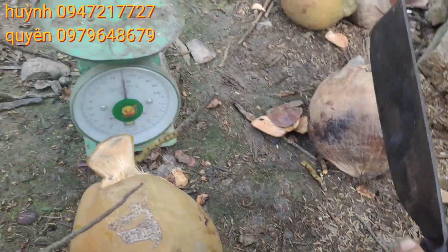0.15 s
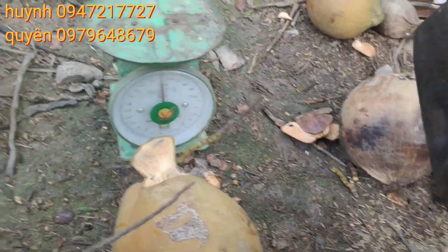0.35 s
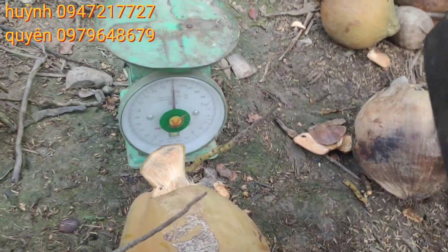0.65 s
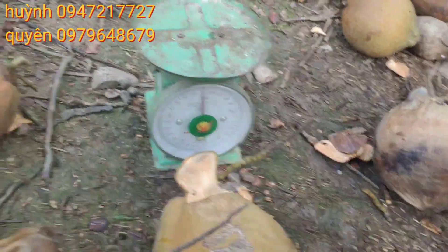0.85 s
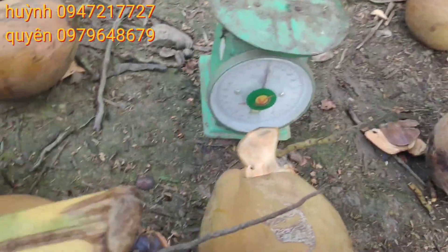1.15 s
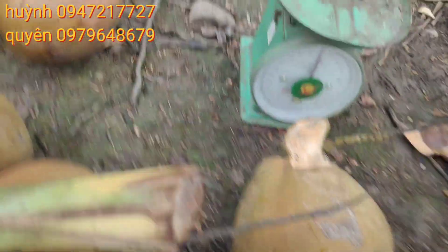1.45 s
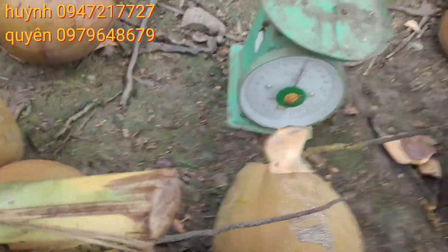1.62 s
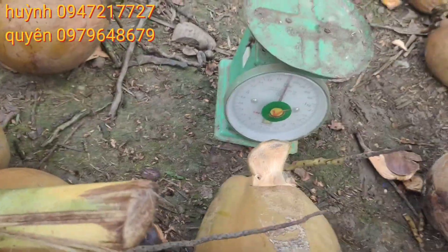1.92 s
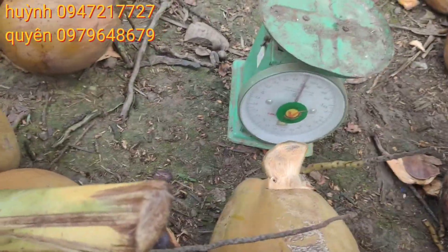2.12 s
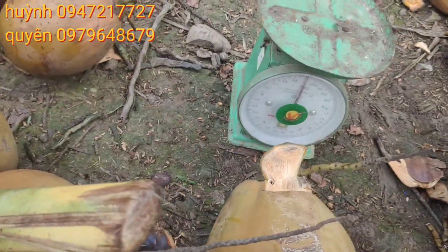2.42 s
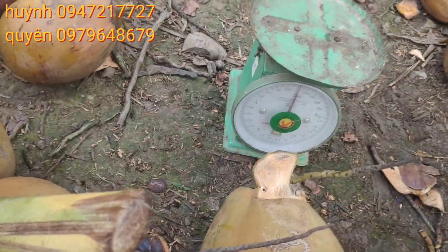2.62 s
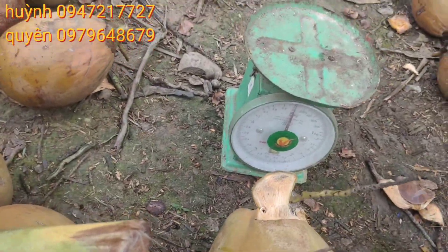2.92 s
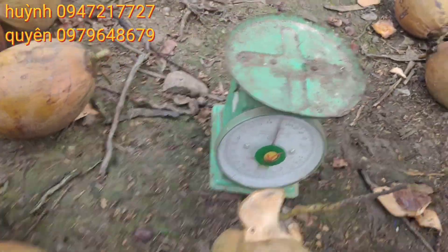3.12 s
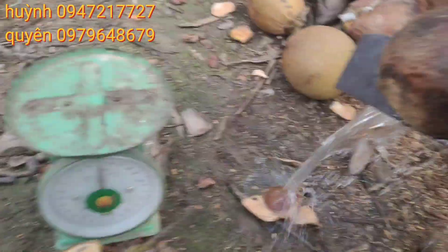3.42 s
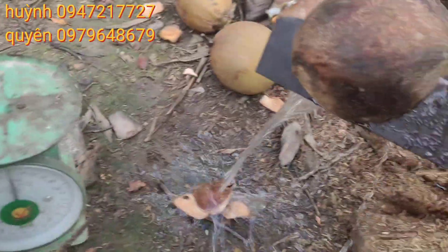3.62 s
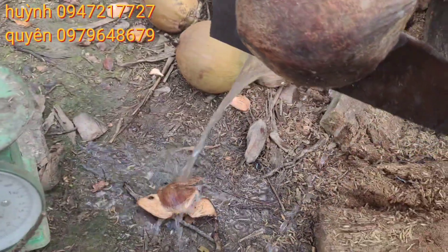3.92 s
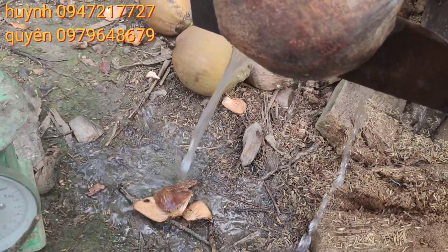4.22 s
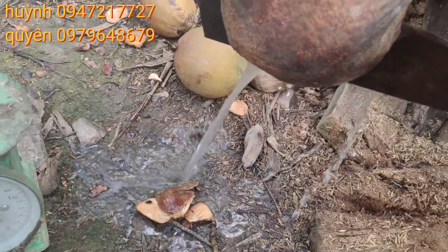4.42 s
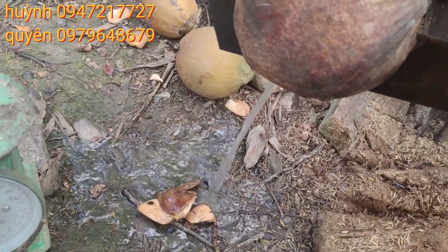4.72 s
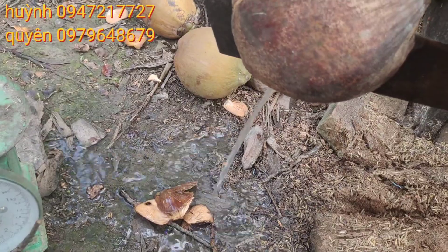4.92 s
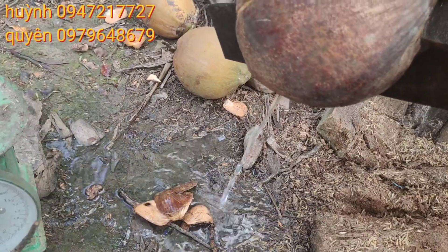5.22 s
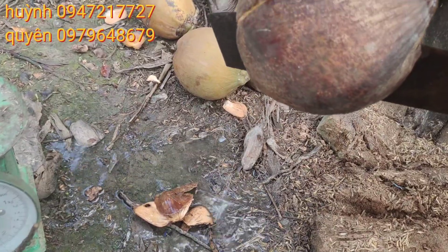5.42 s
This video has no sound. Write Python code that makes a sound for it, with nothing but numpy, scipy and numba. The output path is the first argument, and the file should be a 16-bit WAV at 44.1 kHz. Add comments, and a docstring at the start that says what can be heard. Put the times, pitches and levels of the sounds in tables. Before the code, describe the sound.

Faint hiss and small handling knocks, one loud woody chop into a coconut, then a short gush of liquid splashing and dripping onto soil.

```python
"""Coconut cracked in a yard

Background hiss opens briefly and small knocks sound, then a heavy blade cracks a coconut and the yard rings
after it. Water runs out and patters in drops and splats, over a far engine. Hiss and stream are many tiny
gliding tones over noise; drops are pops with spray and slap; knocks and blow are noise through resonances and
decaying modes; the engine is multiples of a firing rate over rumble. A hand-held phone hears it all."""
import sys
import numpy as np
from scipy import signal
from scipy.fft import rfft, irfft, next_fast_len
from scipy.io import wavfile
from scipy.ndimage import uniform_filter1d
from numba import njit

SR = 44100
rng = np.random.default_rng(int(sys.argv[2]) if len(sys.argv) > 2 else 0)


def log_audio(samples):
    """Write samples as a 16-bit WAV file to the path given in sys.argv[1]."""
    # one column per channel
    frames = np.atleast_2d(samples).T
    # limit to full scale, then quantise
    limited = np.clip(frames, -1, 1)
    pcm = np.round(limited * 32767).astype(np.int16)
    wavfile.write(sys.argv[1], SR, pcm)


N = 244962

# Far engine. Each row: time in seconds, firing rate in Hz, level in dB, upper over lower multiples in dB.
ENGINE = [(0.1, 37.6, -80, -10), (1.1, 38.1, -77.5, -4), (1.3, 37.97, -74, 8), (1.75, 38.27, -64.5, -8.5),
          (2.05, 37.75, -63, -18), (2.3, 37.8, -61, -3.5), (2.7, 37.9, -57.5, -6),
          (3.35, 37.73, -63.5, 11.5), (4.05, 38.3, -56.5, -2.5), (4.28, 38.06, -67.5, 6),
          (4.55, 38.28, -58, 1.5), (4.9, 38.42, -61.5, -4), (5.15, 38.66, -56, -10.5),
          (5.55, 38.1, -59.5, 2)]
LOWER_DB, UPPER_DB = [0, -4], [-6.5, -1.5, -3.5, -14.5]  # multiples 2, 3 and multiples 4 to 7 of the firing rate
# Engine rumble spectrum. Each row: frequency in Hz, level in dB per Hz.
RUMBLE_COLOUR = [(20, -28.5), (38, -19.5), (58, -3.5), (76, -4.5), (193, -2), (323, -15.5), (400, -20.5),
                 (520, -50), (880, -120)]
RUMBLE_DB = -6.5  # rumble over the multiples together
TRAFFIC_DB = -72  # floor under the rumble, before it throbs

# Edges of the low, middle and treble bands of hiss and stream, in Hz.
BAND_EDGES_HZ = [300, 1000, 3500, 16500]
# Brief openings of the background hiss, as through a noise gate. Each row: start in seconds, treble level in dB,
# hold in seconds, fall in dB per second, middle over treble in dB, low over treble in dB.
OPENINGS = [(0.0, -60, 0.14, 113, -2.5, -2), (0.419, -62.5, 0.11, 97, 4.5, -9.5),
            (0.469, -61.5, 0.04, 202, 7, -4), (0.594, -66, 0.051, 700, 8.5, -3.5),
            (0.885, -62, 0.061, 132, -22, -31), (1.17, -65, 0.062, 134, -8, -12),
            (1.472, -68, 0.17, 126, -1.5, 5.5), (2.008, -72, 0.17, 130, -6.5, -10),
            (2.352, -68, 0.36, 125, -4, -5.5)]
# Background hiss spectrum. Each row: frequency in Hz, level in dB per Hz.
HISS_COLOUR = [(150, -55.5), (250, -7), (361, -7.5), (540, -9.5), (1250, -13), (1940, -15.5), (3060, -13),
               (4650, -18.5), (7200, -16.5), (9870, -28.5), (15000, -22), (16400, -38)]
# Faint hiss between openings. Entries: level in dB of the low, middle and treble band.
FAINT_DB = [-81.5, -77, -75.5]
HISS_SPAN_S, HISS_FLICKER_DB, OPENING_RISE_S = (0, 2.92), .6, 0.0079

# Small knocks of handling. Each row: time in seconds, level in dB, body over click in dB, hollowness in dB,
# brightness in dB, husk ring in dB.
TAPS = [(0.7239, -38, -5.5, 15, -14, -11), (0.9, -43, -28, 9, -3.5, -2), (1.284, -54, -9, 22, -20, -10),
        (1.748, -44, -4, 7, -9, 14), (1.8184, -52.5, -3.5, -3, 3, 6), (2.156, -47.5, -32, -7, -11, -3),
        (2.9005, -48.5, -1, -3, -12, 4), (3.021, -50, 8.5, -1.5, -9, 9), (3.0283, -48, 6, -3, -11, -2),
        (3.0744, -53.5, 10.5, -9, -8, 4), (3.1, -40, -2.5, -23, -8, 14), (3.3592, -32, -4.5, -2, -7, 0)]
# Knock resonances, three of the body then three of the click. Each row: frequency in Hz, level in dB,
# time to fall 60 dB in seconds.
TAP_MODES = [(385, -0.5, 0.024), (652, 1.5, 0.017), (980, -4, 0.011), (1550, -2, 0.026),
             (2977, 14.5, 0.028), (6370, 23, 0.0091)]

# The stream. Each row: time in seconds, treble level in dB, middle over treble in dB.
POUR = [(2.85, -57.5, -9.5), (3.19, -65.5, 0.5), (3.23, -51.5, -13.5), (3.4, -52.5, -14),
        (3.52, -43.5, -1.5), (3.8, -47, -7.5), (4.15, -45.5, -2.5), (4.4, -45, -9), (4.7, -47.5, -3.5),
        (4.85, -50.5, -5.5), (5.0, -49.5, -9), (5.12, -55, -8), (5.27, -56, -14), (5.4, -59.5, -3),
        (5.55, -58.5, -7.5)]
# Stream spectrum. Each row: frequency in Hz, level in dB per Hz.
WATER_COLOUR = [(150, -60), (250, -12), (303, -17.5), (632, -15.5), (1070, -17.5), (1250, -11),
                (2150, -9.5), (2850, -7), (4650, -2.5), (7080, 4), (8000, -2.5), (11400, -13.5), (15000, 2),
                (16400, -14)]
# Gurgles that swell the low band. Each row: start in seconds, level in dB, hold in seconds.
GURGLES = [(2.978, -65, 0.28), (3.324, -61, 0.078), (3.84, -55.5, 0.37), (4.49, -65, 0.3),
           (4.848, -61.5, 0.16)]
GURGLE_RISE_S, GURGLE_FALL_DB_S = 0.071, 102
POUR_LOW_DB = -18.5  # low band over treble in a smooth stream
WATER_SPAN_S, WATER_FLICKER_DB = (2.86, 6), 1.2
WATER_LAG = 4  # samples by which the left port hears the water later

# Single drops on the ground, and a few short ticks and knocks. Each row: time in seconds, level in dB,
# middle over treble in dB.
DROPS = [(1.763, -40, -22), (2.178, -38.5, -12), (2.483, -38, -5.5), (2.6, -43.5, -3.5), (2.848, -51.5, 7),
         (2.9465, -40, -31), (2.9767, -32.5, -35), (3.196, -48, -25), (3.216, -31, -20), (3.262, -27, -20),
         (3.325, -43, -10), (3.361, -23.5, -8), (3.384, -34, 5), (3.4194, -28, -6.5), (3.42, -20, -31),
         (3.438, -19.5, -21), (3.499, -38, -18), (3.6101, -29, 0.5), (3.6588, -25, -28), (3.685, -28, -14),
         (3.702, -30, 1), (3.7102, -28, 8.5), (3.728, -29, -20), (3.779, -38, -15), (3.8, -31, -1),
         (3.818, -39, -16), (3.874, -38, -10), (3.9198, -15.5, -21), (3.9318, -18, -25), (3.987, -25, -3.5),
         (4.0821, -29, -15), (4.094, -24.5, -22), (4.113, -26, -18), (4.124, -24, -25), (4.22, -28, 2),
         (4.2383, -24, -9), (4.3074, -30.5, 3.5), (4.3184, -27, -20), (4.362, -30, -4), (4.384, -15.5, -11),
         (4.403, -33, -20), (4.426, -31, -25), (4.486, -33, 3.5), (4.5405, -35, -15), (4.552, -27, -22),
         (4.6342, -26, -22), (4.6477, -36, 7), (4.682, -32, -3), (4.872, -36, -12), (4.942, -34, -13),
         (5.2878, -27.5, -35), (5.311, -41, -6), (5.3274, -23, -16.5), (5.3734, -19, -10),
         (5.3948, -20, -1.5), (5.474, -29.5, -14)]
# Drops sound deeper once a puddle stands. Each row: time in seconds, centre of the slap's band in Hz.
DROP_MIDDLE = [(3.5, 2560), (4.7, 2680), (5.3, 1640)]
PING_HZ, PING_RISE_S, PING_T60_S = (6000, 7300), .0004, .006  # a drop pops at its own pitch in this range
SPRAY_DB, SPRAY_T60_S = -12, 0.017  # hiss thrown up around the pop; a slap throws up more
# lesser drops: how many a second, their least level over the stream's treble, and the spread above it
SMALL_RATE, SMALL_DB, SMALL_SPREAD_DB = 110, 4, 4

DROP_SNAP, BLOW_SNAP = 8.3, 13  # first instant of contact, against spray or grit of rms 1
BLOW_S, BLOW_DB = 1.5394, -10
BITE_S, SPLIT_T60_S = .0015, .014  # time constant of the bite, 60 dB fall of the split
# Resonances of shell and blade. Each row: frequency in Hz, half-width in Hz, level in dB before width scaling.
NUT = [(764, 130, -5.5), (1495, 64, 4.5), (2400, 65, -3), (2800, 45, 0), (3120, 50, -11.5), (3750, 110, -1),
       (4590, 69, -6), (5810, 100, -2.5), (6940, 69, -2)]
# Modes of the block. Each row: frequency in Hz, level in dB before the band-pass, time to fall 60 dB in seconds.
THUMP = [(137, -12, 0.012), (262, -18.5, 0.031), (393, -18, 0.033), (764, -23.5, 0.099), (102.5, -47.5, 3),
         (253, -42, 0.37)]
# Spectrum of the yard's answer. Each row: frequency in Hz, level in dB per Hz.
YARD = [(88, -39), (150, -17), (292, -3.5), (497, -16), (845, -7.5), (1070, -20), (1410, -1.5),
        (1850, -8.5), (2690, -8), (6520, -11), (10600, -31.5), (14900, -30)]
YARD_DB, YARD_T60_S = -21, 0.37
YARD_NUT = 0.42  # share of the shell's pitches in the yard's answer

# The phone's two ports. Each row: frequency in Hz, left minus right in dB.
PORTS = [(60, -4.5), (110, 5.5), (200, -2.5), (380, 1), (700, 3), (1290, -3), (2380, 0.5), (4400, -3),
         (8120, -5), (15000, 1.5)]
TRIP, CEILING = 0.17, 0.52  # amplitudes that trip the gain drop and that peaks round off to
DUCK_DB, CLAMP_S, HOLD_S = -21, 0.017, 0.095  # gain drop, times after the trip when it is full and when it is over
SHELF_HZ, TOP_HZ = 15600, 16450  # the treble steps down, then is cut


def undb(db):
    """Gain of a level in dB."""
    return 10 ** (np.asarray(db) / 20)


def unit(x):
    """Scaled to rms 1."""
    return x / np.sqrt(np.mean(x ** 2))


def curves(table):
    """The columns of a table, one value a sample."""
    s, *columns = np.transpose(table)
    return [np.interp(np.arange(N) / SR, s, c) for c in columns]


def on_hz(table, count):
    """A (Hz, value) table read at the bins of a spectrum, along log frequency."""
    hz, value = np.transpose(table)
    bins_hz = np.arange(count // 2 + 1) * SR / count
    return np.interp(np.log(bins_hz + 1), np.log(hz + 1), value)


def colour(x, table):
    """Sound shaped by a (Hz, dB) spectrum."""
    size = next_fast_len(x.shape[-1])
    return irfft(rfft(x, size) * undb(on_hz(table, size)), size)[..., :x.shape[-1]]


def band(x, lo_hz, hi_hz):
    """Steep band-pass."""
    return signal.sosfilt(signal.butter(3, [lo_hz, hi_hz], "band", fs=SR, output="sos"), x)


def pair(count, alike_hz):
    """Left and right noise, the same in the bass and unrelated above alike_hz."""
    shared, *own = rng.standard_normal((3, count))
    bass = signal.lfilter(*signal.butter(1, alike_hz, fs=SR), shared)
    return bass + signal.lfilter(*signal.butter(1, alike_hz, "high", fs=SR), own)


def walk(rate):
    """Random levels, rate of them a second, slewed from one to the next; spread near 1."""
    k = int(SR / rate)
    steps = np.repeat(rng.standard_normal(N // k + 1), k)
    return 1.8 * uniform_filter1d(steps, k)[:N]


def swell(s, hold, rise, fall_db_s):
    """Gain that rises, holds at 1 and dies away; one that starts at 0 is already up."""
    t = np.arange(N) / SR - s
    return np.clip(t / rise + (s <= 0), 0, 1) * undb(-fall_db_s * np.maximum(t - rise - hold, 0))


def ring(modes, seconds, extra_db):
    """Decaying modes after one blow, each raised or lowered by its own extra_db."""
    t = np.arange(int(seconds * SR)) / SR
    return sum(undb(db + extra) * np.sin(2 * np.pi * hz * t) * undb(-60 * t / t60)
               for (hz, db, t60), extra in zip(modes, extra_db))


def add(out, s, sound, pan_db=0., lag=0):
    """Mix a sound in at a time, the left side changed by pan_db; the right may hear it lag samples later."""
    left, right = np.broadcast_to(sound, (2, sound.shape[-1]))
    first = int(s * SR)
    for ch, x, i in ((0, left * undb(pan_db), first), (1, right, first + lag)):
        out[ch, i:i + len(x)] += x[:N - i]


def patchy(x, spread_db):
    """Narrow bands of a sound swell and sink on their own."""
    cells = signal.stft(x, nperseg=512)[2]
    field = uniform_filter1d(rng.standard_normal(cells.shape[1:]), size=3, axis=0)
    field = uniform_filter1d(field, size=16, axis=1)
    return signal.istft(cells * undb(spread_db * unit(field)), nperseg=512)[1][:, :x.shape[1]]


@njit
def grains(count, start, hz, cycles, size, lag, glide):
    """Tiny damped tones that glide upward; the right side hears each lag samples later."""
    out = np.zeros((2, count + 2048))
    for g in range(len(start)):
        step, phase, a = 2 * np.pi * hz[g] / SR, 0., 1.
        fade = np.exp(-hz[g] / (cycles[g] * SR))
        for i in range(min(int(4 * cycles[g] * SR / hz[g]), 1500)):
            wave = a * np.sin(phase)
            out[0, start[g] + i + 16] += size[g, 0] * wave
            out[1, start[g] + i + 16 + lag[g]] += size[g, 1] * wave
            phase, a = phase + step * (1 + glide * (1 - a)), a * fade
    return out[:, 16:count + 16]


def patter(gains, span, spectrum, rate, spread_db, cycles, bed, flicker_db, alike_hz, lag):
    """Many tiny ticks over a smooth bed, each sounding three pitches; three bands have their own level."""
    first, last = int(span[0] * SR), min(int(span[1] * SR), N)
    count = last - first
    # draws shared by the three pitches of a tick, then draws for each pitch
    tick = np.repeat(rng.random((int(rate * count / SR), 4)), repeats=3, axis=0).T
    part = rng.random((tick.shape[1], 3)).T
    start = (tick[0] * (count - 100) + 60 * part[0]).astype(np.int64)
    hz = 300 * (13000 / 300) ** part[1]
    # rising with pitch for a flat spectrum
    size = hz * undb(spread_db * np.minimum(-np.log(tick[1] + 1e-9), 3))
    sides = size[:, None] * undb(np.outer(tick[2] - .5, [8, -8]))
    turns = cycles * (.4 + 1.6 * part[2] ** 2)
    side_lag = (10 * tick[3] - 5 - lag).astype(np.int64)
    ticks = grains(count, start, hz, turns, sides, side_lag, .06)
    left, right = patchy(pair(count, alike_hz), spread_db=3)
    smooth = np.array([np.roll(left, lag), right])
    sound = colour(unit(ticks) + bed * smooth, spectrum)
    gush, out = walk(20), np.zeros((2, N))  # the gush moves all bands together
    for lo, hi, gain in zip(BAND_EDGES_HZ, BAND_EDGES_HZ[1:], gains):
        level = gain * undb(flicker_db * (gush + walk(25.11)))
        out[:, first:last] += unit(band(sound, lo, hi)) * level[first:last]
    # fade at the ends of the span, except where it meets the start or end of the scene
    i = np.arange(N)
    fade = np.minimum(i - first + (first == 0) * SR, last - i + (last == N) * SR)
    return out * np.clip(fade / 2000, 0, 1)


def engine():
    """A far motor: wavering multiples of its firing rate over a low rumble."""
    hz, lower_db, upper_db = curves(ENGINE)
    levels = [lower_db + db for db in LOWER_DB] + [lower_db + upper_db + db for db in UPPER_DB]
    turn = 2 * np.pi * np.cumsum(hz) / SR
    lines = sum(np.sqrt(2) * undb(db + 1.5 * walk(6)) * np.sin(k * turn + 0.23 * walk(3.3))
                for k, db in enumerate(levels, 2))
    together = np.sqrt(sum(undb(db) ** 2 for db in levels))
    rumble_level = np.hypot(undb(RUMBLE_DB) * together, undb(TRAFFIC_DB))
    rumble = unit(colour(pair(N, 260), RUMBLE_COLOUR)) * rumble_level
    return lines + rumble * (1 + 0.25 * np.cos(turn))  # the rumble throbs once a firing


def background_hiss():
    """A faint hiss that opens quickly at set times, holds and dies away; powers add in each band."""
    power = undb(FAINT_DB)[:, None] ** 2
    for s, db, hold, fall_db_s, middle_db, low_db in OPENINGS:
        bands = undb([db + low_db, db + middle_db, db])
        power = power + np.outer(bands, swell(s, hold, OPENING_RISE_S, fall_db_s)) ** 2
    return patter(np.sqrt(power), HISS_SPAN_S, HISS_COLOUR, rate=340, spread_db=4.5, cycles=1.9, bed=5,
                  flicker_db=HISS_FLICKER_DB, alike_hz=1150, lag=0)


def taps():
    """Small dull knocks of blade, husk and hand; hollow ones favour the lowest mode, bright ones the highest."""
    out, t = np.zeros((2, N)), np.arange(int(.05 * SR)) / SR
    for s, db, body_db, hollow_db, bright_db, husk_db in TAPS:
        scrape = rng.standard_normal(len(t)) * undb(-60 * t / 0.038)
        scrape[0] += 3  # a hard edge, then a scuff
        body_ring = ring(TAP_MODES[:3], .05, [hollow_db, 0, -hollow_db])
        body = band(signal.fftconvolve(scrape, body_ring)[:len(t)], 283, 3100)
        click_ring = ring(TAP_MODES[3:], .05, [-bright_db, husk_db, bright_db])
        click = signal.fftconvolve(scrape, click_ring)[:len(t)]
        click = click / abs(click).max() + 0.36 * band(scrape, 1650, 6200)
        add(out, s, undb(db) * (click + undb(body_db) * body / abs(body).max()), lag=5)
    return out


def water():
    """The stream patters; now and then a gurgle fills in the low band."""
    treble_db, middle_db = curves(POUR)
    low = undb(treble_db + POUR_LOW_DB) ** 2
    for s, db, hold in GURGLES:
        low = low + (undb(db) * swell(s, hold, GURGLE_RISE_S, GURGLE_FALL_DB_S)) ** 2
    gains = np.sqrt(low), undb(treble_db + middle_db), undb(treble_db)
    return patter(gains, WATER_SPAN_S, WATER_COLOUR, rate=900, spread_db=2.5, cycles=3.8, bed=.85,
                  flicker_db=WATER_FLICKER_DB, alike_hz=3940, lag=WATER_LAG)


def small_drops():
    """Lesser drops fall at random while the stream runs, their levels following its treble."""
    first_s, seconds = 3.15, 2.4
    chance = rng.random((int(SMALL_RATE * seconds), 3)).T
    when = first_s + seconds * chance[0]
    stream_db = np.interp(when, *np.transpose(POUR)[:2])
    db = stream_db + SMALL_DB - SMALL_SPREAD_DB * np.log(1 - .98 * chance[1])
    return list(zip(when, db, -25 * chance[2]))


def drops():
    """Each is a short high pop in a little spray; some add a deeper slap, set row by row."""
    out, t = np.zeros((2, N)), np.arange(int(.025 * SR)) / SR
    for s, db, middle_db in DROPS + small_drops():
        low, side = rng.random(2)
        ping_hz = PING_HZ[1] - (PING_HZ[1] - PING_HZ[0]) * low ** 2
        ping_gain = np.minimum(t / PING_RISE_S, undb(-60 * (t - PING_RISE_S) / PING_T60_S))
        ping = np.sin(2 * np.pi * ping_hz * t) * ping_gain
        burst = pair(len(t), 2630) * (undb(-60 * t / SPRAY_T60_S) + 0.21 * undb(-60 * t / 0.061))
        burst[:, 2] += DROP_SNAP
        slap_hz = np.interp(s, *np.transpose(DROP_MIDDLE))
        spray = band(burst, 6300, 17300)
        slap = band(burst, slap_hz / 1.7, slap_hz * 1.7)
        spray_gain = undb(SPRAY_DB) + undb(min(middle_db, 0))
        sound = ping + spray_gain * spray / abs(spray).max() + undb(middle_db) * slap / abs(slap).max()
        add(out, s, undb(db) * sound, pan_db=-10 + 3.3 * side, lag=-WATER_LAG)
    return out


def nut(x):
    """Sound through the resonances of shell and blade, in alternating polarity."""
    return sum((-1) ** k * undb(db) * np.sqrt(300 / half_hz)
               * signal.lfilter(*signal.iirpeak(hz, hz / (2.0 * half_hz), SR), x)
               for k, (hz, half_hz, db) in enumerate(NUT))


def yard():
    """The yard's answer: patchy decaying noise that keeps some of the shell's pitches."""
    t = np.arange(SR) / SR
    echoes = colour(patchy(pair(SR, 410), spread_db=3), YARD)
    echoes = unit(unit(echoes) + YARD_NUT * unit(nut(echoes)))
    return undb(YARD_DB) * echoes * undb(-60 * t / YARD_T60_S)


def shell():
    """The blade bites in over a few ms, then the shell splits and its resonances ring from the grit."""
    t = np.arange(int(.07 * SR)) / SR - .01  # 0 at the moment of contact
    split = undb(-60 * np.maximum(t - .0008, 0) / SPLIT_T60_S)
    grit = pair(len(t), 2500) * np.where(t < 0, np.exp(t / BITE_S), split)
    grit[:, np.argmax(t >= 0)] += BLOW_SNAP
    crack = 0.28 * band(grit, 730, 8000) + .03 * grit + nut(grit)
    loudness = np.sqrt(np.mean(crack[:, abs(t - .001) < .002] ** 2))  # rms around the contact
    return undb(BLOW_DB) * crack / loudness


def blow():
    """The shell cracks, the block thumps in decaying modes and the yard answers."""
    out = np.zeros((2, N))
    add(out, BLOW_S - .01, shell(), pan_db=-0.5, lag=11)
    thump = band(ring(THUMP, 2.5, np.zeros(len(THUMP))), 70, 2000)
    add(out, BLOW_S - .0007, thump, lag=14)
    add(out, BLOW_S + 0.004, yard())
    return out


def scene():
    """All the layers, from the background to the blow."""
    return engine() + background_hiss() + taps() + water() + drops() + blow()


def record(dry):
    """Two unequal ports; a loud peak pulls the gain down for a while, is rounded off, and the top is cut."""
    x = np.array([colour(dry[ch], [(hz, db * (.5 - ch)) for hz, db in PORTS]) for ch in (0, 1)])
    over = np.flatnonzero(uniform_filter1d(abs(x).max(axis=0), size=40) > TRIP) / SR
    trips = over[np.diff(over, prepend=-1) > HOLD_S]
    t, gain_db = np.arange(N) / SR, np.zeros(N)
    for s in trips:
        gain_db += np.interp(t - s, [.004, CLAMP_S, HOLD_S - .002, HOLD_S], [0, DUCK_DB, DUCK_DB, 0])
    x = CEILING * np.tanh(x * undb(gain_db) / CEILING)
    x = colour(x, [(20, -14), (70, 0), (SHELF_HZ - 150, 0), (SHELF_HZ + 150, -14)])
    return signal.sosfilt(signal.ellip(10, .2, 80, TOP_HZ, fs=SR, output="sos"), x)


dry = scene()
out = record(dry)
log_audio(out)
```